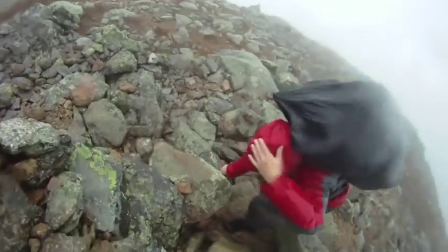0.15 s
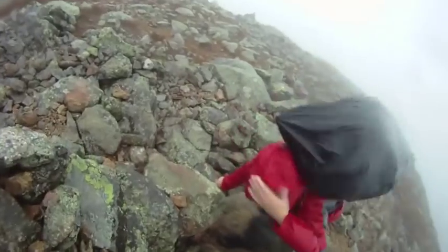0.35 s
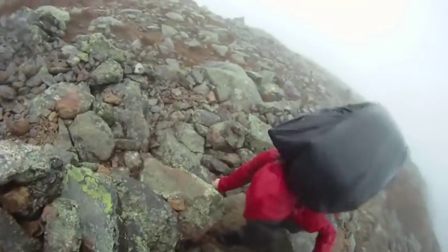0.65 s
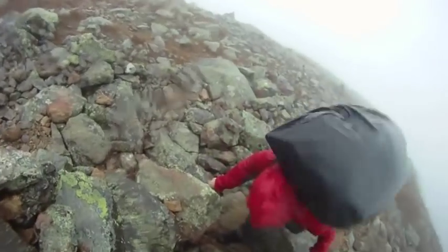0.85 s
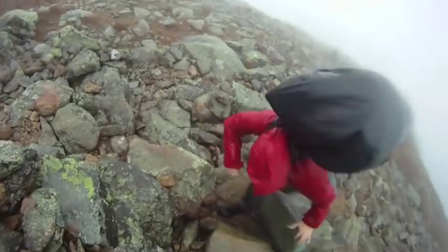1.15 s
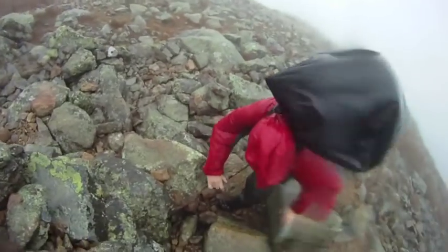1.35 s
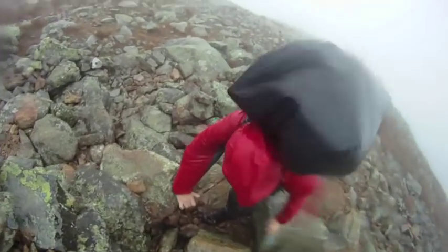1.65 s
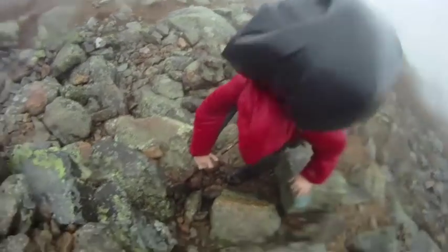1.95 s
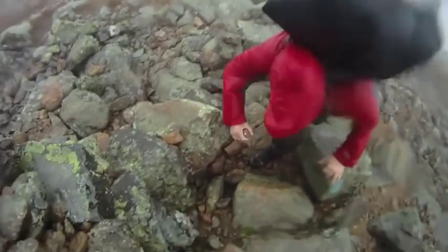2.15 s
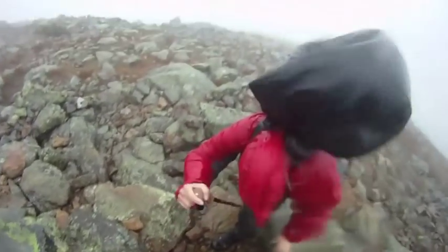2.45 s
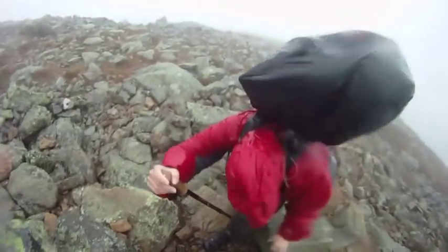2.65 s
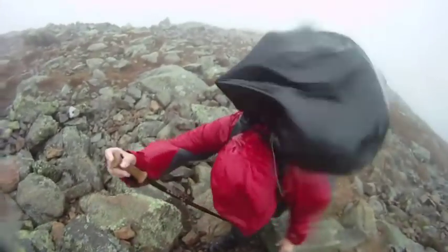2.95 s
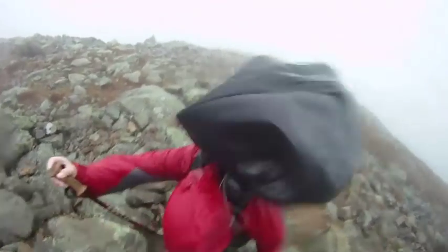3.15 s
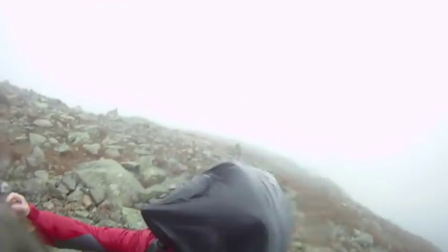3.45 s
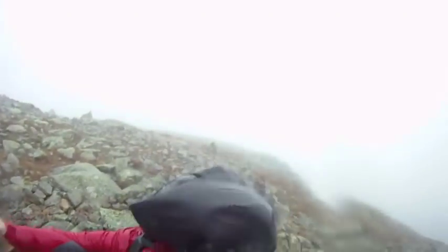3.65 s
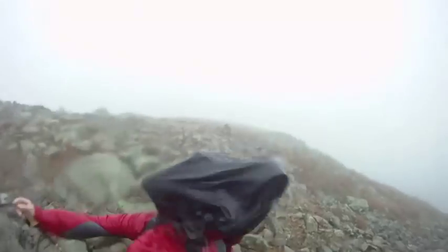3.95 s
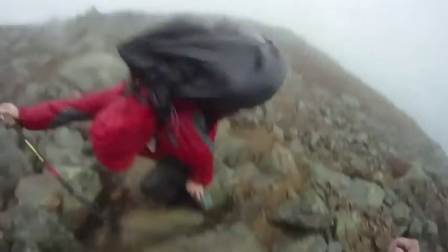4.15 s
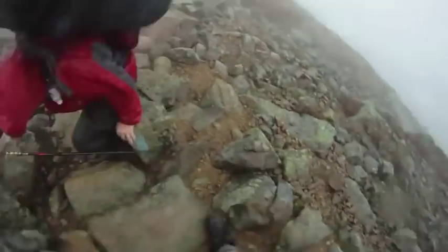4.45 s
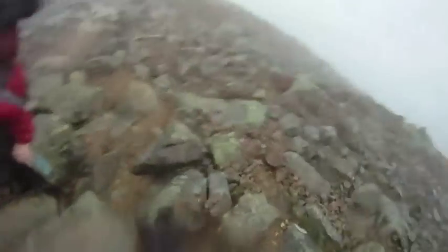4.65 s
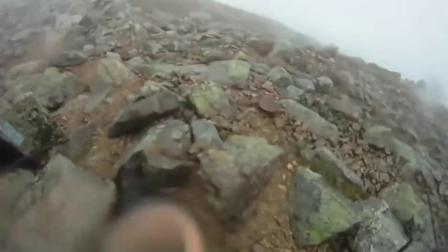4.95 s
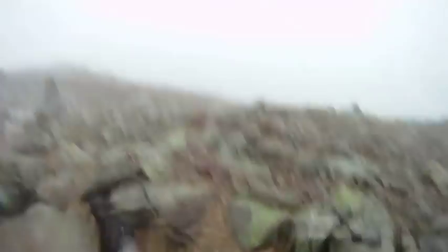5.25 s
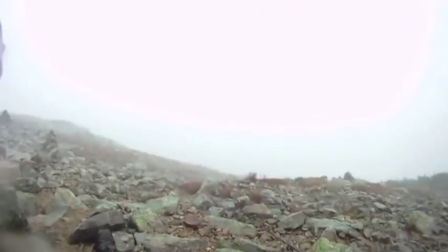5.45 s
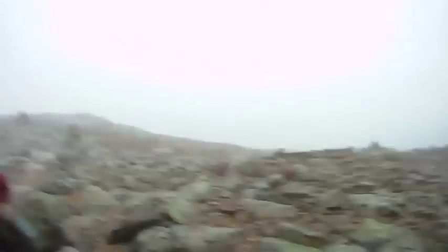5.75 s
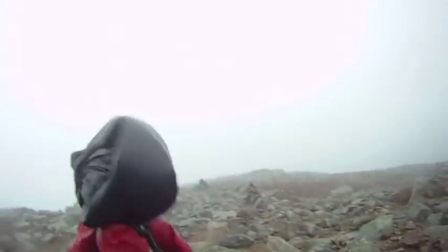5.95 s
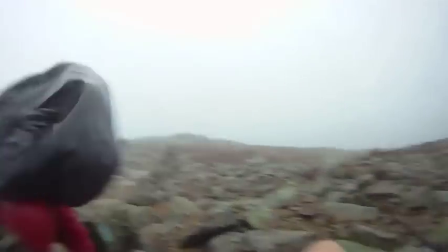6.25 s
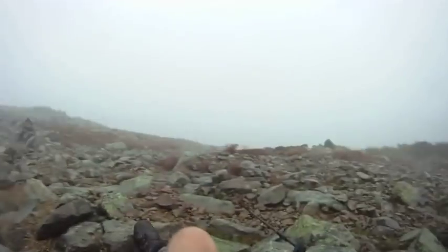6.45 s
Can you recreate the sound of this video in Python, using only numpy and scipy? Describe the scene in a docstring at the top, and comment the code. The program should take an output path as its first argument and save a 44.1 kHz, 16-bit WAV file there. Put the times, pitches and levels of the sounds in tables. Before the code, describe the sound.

Rain smacks the plastic case of a small body-worn camera in a storm on an open ridge. At first, soft, scattered drops tick over a low wind rumble. From 0.75 to 1.3 seconds they crowd into a rapid, loud flurry of sharp cracks, each with a brief plastic ring, some with a dull thud. Until about 3.5 seconds separate hard smacks and light ticks continue irregularly, while short gusts bump and hiss, the wind swelling around 3. From 3.6 to 4.8 seconds the hits soften, with thicker fine pattering. Between 4.9 and 5.75 the rain almost stops; a fluttering wind swell at 5 drops back to low buffeting. A gust and loud smack near 5.8 to 5.9 restart the pattering, with one more strong crack around 6.4. Everything is very close and dry, loud hits flattening and briefly dipping the level.

```python
"""Rain smacks against the plastic housing of a small body-worn camera, in a storm on a bare mountain ridge.
Each heavy drop cracks, rings the case and thuds; finer droplets tick at random between them.
Behind the rain the wind swells and eases: shaped noise gives a low buffeting, a flutter of eddies
and a rush over the case, with short gusts on top.
Loud smacks overload the microphone and make its gain duck for a moment."""
import sys
import numpy as np
from scipy import signal
from scipy.fft import rfft, irfft
from scipy.io import wavfile
from scipy.ndimage import uniform_filter1d

SR = 44100
rng = np.random.default_rng(int(sys.argv[2]) if len(sys.argv) > 2 else 0)


def wav_out(sig):
    """Save sig, one row per channel (or a flat mono array), as 16-bit PCM at SR to the path in sys.argv[1]."""
    wavfile.write(sys.argv[1], SR, np.round(np.clip(np.atleast_2d(sig).T, -1, 1) * 32767).astype(np.int16))


N = 291536   # length of the scene in samples


def from_db(db):
    """Turn decibels into a gain."""
    return 10 ** (np.asarray(db) / 20)


def rms_one(x):
    """Scale to rms 1."""
    return x / np.sqrt(np.mean(x ** 2) + 1e-20)


def peak_one(hits):
    """Scale each row so that its loudest moment (36 samples long) has rms 1."""
    power = uniform_filter1d(hits ** 2, size=36)
    return hits / np.sqrt(power.max(axis=1, keepdims=True) + 1e-20)


def in_time(rows):
    """Draw each column of a table as a curve with a value at every sample."""
    t, *columns = np.transpose(rows)
    return [np.interp(np.arange(N) / SR, t, column) for column in columns]


def butter(x, hz, kind, order=2):
    """Keep the lows or the highs with a causal filter."""
    sos = signal.butter(order, min(hz, .45 * SR), kind, fs=SR, output="sos")
    return signal.sosfilt(sos, x + 1e-18)


def drift(rate_hz):
    """Wander slowly at random, with spread 1."""
    step = 40   # one random value per 40 samples is enough for a slow curve
    r = np.exp(-2 * np.pi * rate_hz * step / SR)
    raw = rng.standard_normal(N // step + 2002)
    slow = signal.lfilter([1], [1, -2 * r, r * r], raw)[2000:]   # skip the filter's start
    return np.interp(np.arange(N) / step, np.arange(len(slow)), rms_one(slow))


def noise(spectrum):
    """Shape random noise to a given spectrum, rms 1."""
    hz, db = np.transpose(spectrum)
    grid = np.maximum(np.fft.rfftfreq(N, 1 / SR), 1)
    gain = from_db(np.interp(np.log(grid), np.log(hz), db))
    return rms_one(irfft(rfft(rng.standard_normal(N)) * gain, N))


def colour(x, peaks):
    """Pass sound through a chain of resonances (positive dB) and hollows (negative dB)."""
    for hz, width_hz, db in peaks:
        g = from_db(db / 2)
        k = np.tan(np.pi * width_hz / SR)
        c = -2 * np.cos(2 * np.pi * hz / SR)
        x = signal.lfilter([1 + k * g, c, 1 - k * g], [1 + k / g, c, 1 - k / g], x)
    return x


# heavy drops on the case: t/s, level/dB, f/Hz of the ring before it wavers,
# thud/dB before the lift shared by all thuds, length/ms
HEAVY_DROPS = [(0.0044, -13.5, 1230, -51, 1.8), (0.0215, -12.5, 1300, -35, 3.1),
               (0.1807, -20, 3570, -40, 4.6), (0.1987, -16, 3050, -58, 2.1), (0.2976, -6.5, 2100, -33, 1.7),
               (0.3482, -14.5, 1230, -53, 2.5), (0.4547, 0, 2257, -23, 1), (0.564, -9.5, 2560, -31, 2.1),
               (0.572, -14.5, 2280, -44, 2.3), (0.607, -2.5, 2440, -39, 1.33),
               (0.6489, -10, 3430, -46, 2.4), (0.7389, -12, 2300, -39, 1.3), (0.7626, -13, 2250, -46, 2),
               (0.7707, -7.5, 2130, -31, 1.7), (0.8052, 2.5, 2050, -30, 1.14), (0.852, 4, 3700, -38, 1.03),
               (0.8568, 5, 3690, -35, 1.7), (0.869, 1.5, 1620, -37, 1.9), (0.8822, -5, 3580, -47, 2.2),
               (0.9241, -1.5, 2775, -50, 3.3), (0.9986, 0.5, 3480, -17, 4.1),
               (1.0352, -2.5, 2870, -56, 2.2), (1.063, -4, 2160, -39, 2.8), (1.0948, 2.5, 2830, -48, 2.3),
               (1.1289, -4, 3080, -84, 2.2), (1.1423, -5.5, 2700, -54, 1.1), (1.1523, -5, 3050, -25, 1.9),
               (1.165, 7.5, 3790, -28, 1.2), (1.1828, 6.5, 2180, -49, 1.8), (1.2397, 1.5, 2030, -37, 0.95),
               (1.285, -14, 3540, -37, 2.3), (1.3521, -10.5, 2770, -47, 2.4), (1.3872, -10, 2130, -37, 1.4),
               (1.4069, -12, 2240, -32.5, 3.1), (1.4503, -3, 1370, -19, 1.4), (1.491, -4, 3590, -54, 1),
               (1.5975, -5.5, 2320, -37, 2.3), (1.6078, -8, 2050, -49, 2.5), (1.6763, -6.5, 2180, -47, 1.3),
               (1.7, -11.5, 2340, -35, 3.1), (1.7082, -6, 2250, -36, 1.9), (1.748, -5, 1360, -60, 2.8),
               (1.8299, -14.5, 3550, -42, 2), (1.8907, -3.5, 1860, -40, 1.46), (1.92, -6.5, 2210, -45, 1.5),
               (1.9397, 1, 3350, -42, 1.46), (2.1288, -15.5, 2820, -43, 2.7), (2.308, 4.5, 2060, -33, 1.23),
               (2.4067, 0.5, 2330, -40, 3), (2.466, -9, 1255, -56, 1.95), (2.49, -7.5, 2220, -57, 1.9),
               (2.6889, 4, 2180, -43, 1.12), (2.7899, 0, 3570, -37, 1.75), (2.9034, -10.5, 2280, -35, 1.6),
               (3.02, -6.5, 2990, -30, 2.7), (3.0743, -7.5, 3570, -43, 3), (3.1083, -2.5, 2070, -73, 1.1),
               (3.1274, -1.5, 2670, -44, 2.6), (3.1897, -7.5, 1800, -35, 1), (3.2663, -7.5, 1880, -46, 2.5),
               (3.2894, -3.5, 1550, -43, 2.6), (3.3165, -8, 1880, -37, 0.59), (3.3298, -3, 3650, -31, 1.7),
               (3.3464, -3, 2190, -39, 1.3), (3.4128, -12.5, 3520, -45, 2.1), (3.4591, 3.5, 1950, -44, 1.6),
               (3.6359, -1.5, 2170, -28, 2.24), (3.6638, -15, 2290, -57, 2), (3.7513, -6.5, 3610, -37, 2.3),
               (3.8003, -13.5, 2170, -44, 1.3), (3.8496, -0.5, 2910, -38, 1.9),
               (3.908, -2.5, 2110, -39, 1.8), (3.9684, -11.5, 3470, -53, 1.9),
               (3.977, -14.5, 2680, -48, 2.9), (3.9922, -16, 2300, -48, 2), (4.1143, -6, 2720, -32, 2.3),
               (4.154, -14.5, 2040, -47, 3.9), (4.2, -4.5, 2900, -40, 1.4), (4.2661, -16.5, 2070, -45, 1.4),
               (4.3076, -9, 1930, -40, 1.3), (4.342, -12.5, 2900, -44, 1.5), (4.355, -9.5, 2720, -35, 2.9),
               (4.4035, -7, 2160, -56, 1.9), (4.4394, -6, 3320, -51, 2.5), (4.481, -7.5, 2470, -53, 2),
               (4.6283, -9.5, 2150, -35, 2.3), (4.647, -10.5, 2190, -29.5, 2.1),
               (4.6675, -12, 2630, -60, 4.5), (4.7566, -12, 3600, -50, 1.7), (4.79, -15.5, 2230, -49, 1.7),
               (4.8417, -18, 2770, -48, 1.3), (4.8579, -9, 2220, -55, 1.5), (5.4071, -24, 3670, -42, 3.1),
               (5.5644, -12, 1300, -55, 2.3), (5.7943, -11.5, 3340, -34.5, 1.7),
               (5.8619, -12.5, 2500, -39, 2.3), (5.904, 5.5, 2815, -25, 1.2), (5.9122, -8, 2390, -50, 3),
               (5.9466, -7, 2380, -55, 2.4), (6.0791, -4, 3560, -55, 1.7), (6.109, -11.5, 2630, -36, 3.5),
               (6.1526, -15.5, 1930, -49, 3.7), (6.2158, -12, 2280, -35.5, 1.8),
               (6.2606, -13, 3030, -38, 1.6), (6.2945, -9.5, 1920, -46, 3), (6.3096, -12, 2190, -44, 3.5),
               (6.3664, -1, 1950, -49, 1.64)]
# resonances of the case, as the wind rings it: f/Hz, width/Hz, level/dB
CASE_RESONANCES = [(1208, 79, 9), (2150, 415, 8.5), (3640, 167, 10)]


def drops(rows, wobble=0.3196, splash=1.0, splash_pitch_hz=2600, overload_db=-3.5, thud_lift_db=8.5,
          crack=1.0, crack_s=0.0001):
    """Each drop cracks, then rings its spot on the case as it spreads; hard ones are clipped flat."""
    s, level_db, pitch_hz, thud_db, length_ms = np.array(rows).T[:, :, None]
    t = np.arange(SR // 80) / SR
    waver, spray, slap = rng.standard_normal((3, len(rows), len(t)))

    age = t / (length_ms / 1000)
    fade = np.exp(-age ** 3) + .05 * np.exp(-t / .002)
    spreading = (1 - np.exp(-t / .0003)) * fade

    bend = np.exp(wobble * rms_one(butter(waver, 1163, "low")))   # the water's load bends the pitch
    ring = np.sin(2 * np.pi * np.cumsum(pitch_hz * bend, axis=1) / SR)
    spray = butter(butter(spray, 1450, "high", order=1), 9900, "low", order=1)
    spray = spray * splash * pitch_hz / splash_pitch_hz   # higher-ringing drops splash more
    hits = spreading * (ring + spray) + crack * spray * np.exp(-t / crack_s)

    damped = np.array(CASE_RESONANCES) * [1, 2, .5]   # the water makes them wider and weaker
    hits = peak_one(colour(butter(hits, 1400, "high"), damped))
    drive_db = np.clip((level_db - overload_db) / 2, -10, 8)
    hits = peak_one(np.tanh(hits * from_db(drive_db)))   # the harder the drop, the flatter its peaks

    thud = butter(butter(slap * spreading, 900, "low"), 135, "high")   # the whole case is jolted
    hits = from_db(level_db) * hits + from_db(thud_db + thud_lift_db) * peak_one(thud)
    at = (np.maximum(s, 0) * SR).astype(int) + np.arange(len(t))
    return np.bincount(at.ravel(), hits.ravel(), N)[:N]


# how thickly the fine rain falls: t/s, rate/(droplets per s)
DRIZZLE_RATE = [(0, 60), (.55, 70), (.8, 190), (1.25, 180), (1.55, 55), (1.9, 70), (2.1, 25), (2.9, 35),
                (3.9, 90), (4.7, 110), (4.88, 3), (5.78, 10), (5.8, 120), (6.3, 60), (6.4, 12)]
DROPLET_DB, DROPLET_SPREAD_DB = -24, 5   # in average wind
DROPLET_FOLLOWS = 0.35   # dB of droplet level per dB of change in the rush
DROPLET_THUD_DB = -48   # against the droplet's tick, before the lift shared by all thuds


def drizzle(per_s, rush_db, length_ms=1.0, pitch_hz=2714.0):
    """Droplets of many sizes tick at random between the heavy drops, harder in faster air."""
    at = np.flatnonzero(rng.random(N) < per_s / SR)
    size, length, spot = np.clip(rng.standard_normal((len(at), 3)), -2, 2).T
    wind_lift_db = DROPLET_FOLLOWS * (rush_db[at] - rush_db.mean())
    levels = DROPLET_DB + DROPLET_SPREAD_DB * size + wind_lift_db
    lengths = length_ms * np.exp(0.26 * length)
    pitches = pitch_hz * np.exp(0.381 * spot)
    return drops(np.column_stack([at / SR, levels, pitches, levels + DROPLET_THUD_DB, lengths]))


# slow swell of the wind, before the gusts:
# t/s, buffeting level/dB, fluttering eddies level/dB, rush over the case level/dB
WIND_SWELL = [(0, -34.5, -49.5, -45), (.48, -34, -51, -41.5), (.85, -25.5, -42.5, -36),
              (1.35, -29.5, -46, -32.5), (1.62, -27, -53, -46), (2.0, -31.5, -46, -39.5),
              (2.72, -28.5, -41.5, -34.5), (2.9, -25, -38, -32), (3.6, -27.5, -40, -34.5),
              (4.3, -37, -42, -32.5), (4.55, -37.5, -46.5, -38), (4.85, -29.5, -49, -44),
              (5.02, -25, -34, -32.5), (5.3, -29, -51, -63), (5.68, -33, -45.5, -40),
              (6.05, -34, -43.5, -40.5), (6.4, -27, -46.5, -40), (6.6, -22.5, -37, -37.5)]
# short gusts: t/s at the crest, length/s, lift of the buffeting/dB, lift of the rush/dB
SHORT_GUSTS = [(0.805, 0.069, 4.5, 14.5), (1.185, 0.07, -2.5, 8.5), (1.328, 0.084, 7, -6),
               (1.451, 0.033, 8.5, 11), (1.898, 0.093, 1, 16), (2.07, 0.062, 8.5, 1), (2.168, 0.16, 7, -1),
               (2.29, 0.11, 5.5, 9.5), (2.392, 0.17, 5, 4.5), (2.581, 0.052, 5, -7), (2.986, 0.17, 5, -0.5),
               (3.248, 0.04, 6, 1.5), (3.345, 0.029, 17, 9), (3.444, 0.028, 7.5, 2.5),
               (3.593, 0.11, 6.5, -1), (3.808, 0.11, 2.5, 4.5), (4.045, .1, 7.5, -1),
               (5.813, 0.055, 15, 12.5)]


def airflow():
    """Each gust is a smooth hump on the slow swell; the eddies follow the mean of its two lifts."""
    buffet_db, eddy_db, rush_db = in_time(WIND_SWELL)
    t = np.arange(N) / SR
    for s, length_s, buffet_lift_db, rush_lift_db in SHORT_GUSTS:
        hump = np.cos(np.pi * np.clip((t - s) / length_s, -.5, .5))
        buffet_db = buffet_db + buffet_lift_db * hump
        eddy_db = eddy_db + (buffet_lift_db + rush_lift_db) / 2 * hump
        rush_db = rush_db + rush_lift_db * hump
    return buffet_db, eddy_db, rush_db


# colour of the buffeting noise: f/Hz, relative level/dB per Hz
BUFFET_SPECTRUM = [(12, 1), (24, -3.5), (33, 2), (50, 4), (75, 1), (115, -7), (190, -21.5), (330, -37.5)]
# colour of the fluttering eddies: f/Hz, relative level/dB per Hz
EDDY_SPECTRUM = [(60, -1), (150, 5), (250, 0.5), (420, -9), (800, -10.5), (1500, -9.5), (4000, -90)]
# colour of the rush before the case rings: f/Hz, relative level/dB per Hz
RUSH_SPECTRUM = [(300, -77), (750, -5), (1100, 0), (2000, 0), (3000, 0.5), (4200, -5), (5300, -7),
                 (6050, -14), (7000, -11.5), (10500, -8), (12000, -16.5), (13500, -11), (15000, -31)]


def wind(buffet_db, eddy_db, rush_db, lumpy_db=2.5, eddy_flutter_db=3.0, grain_db=6.5, brightening=0.42):
    """Large eddies push on the microphone; small ones flutter and rush along the case, sharing swirls."""
    swirl = drift(21.5)
    push = noise(BUFFET_SPECTRUM)
    push = push / np.sqrt(uniform_filter1d(push ** 2, size=SR // 18))   # even out its own slow swells
    buffet = push * from_db(buffet_db + lumpy_db * swirl)

    flutter = (swirl + drift(20)) / np.sqrt(2)
    eddies = noise(EDDY_SPECTRUM) * from_db(eddy_db + eddy_flutter_db * flutter)

    rush = rms_one(colour(noise(RUSH_SPECTRUM), CASE_RESONANCES))
    treble = rush - butter(rush, 4400, "low", order=1)
    treble_lift_db = brightening * (rush_db - rush_db.mean())
    rush = rush + treble * (from_db(treble_lift_db) - 1)   # faster air hisses brighter
    grain = (swirl + drift(70)) / 2
    return buffet + eddies + rush * from_db(rush_db + grain_db * grain)


def scene():
    """Add heavy drops, fine rain and wind on the case."""
    buffet_db, eddy_db, rush_db = airflow()
    per_s, = in_time(DRIZZLE_RATE)
    air = wind(buffet_db, eddy_db, rush_db)
    return (air + drizzle(per_s, rush_db) + drops(HEAVY_DROPS))[None]


def gain_control(x, threshold_db=-17.5, slope=0.45, release_db_per_s=125.0, attack_s=0.0052):
    """A loud smack pulls the gain down just after it; the gain then creeps back."""
    power = np.abs(butter(butter(x, 460, "high") ** 2, 190, "low", order=1))   # deaf to the low buffeting
    over_db = np.maximum(10 * np.log10(power + 1e-12) - threshold_db, 0)
    recovery = release_db_per_s * np.arange(N) / SR
    held_db = np.maximum.accumulate(slope * over_db + recovery) - recovery
    r = np.exp(-1 / (attack_s * SR))
    cut_db = signal.lfilter([(1 - r) ** 2], [1, -2 * r, r * r], held_db)   # the gain needs time to drop
    return x * from_db(-cut_db)


# resonances of the microphone's port: f/Hz, width/Hz, level/dB
PORT_RESONANCES = [(8380, 450, 6), (9600, 1000, 3), (14350, 1200, 6)]
# hollows where echoes inside the housing cancel: f/Hz, width/Hz, level/dB
HOUSING_HOLLOWS = [(5983, 387, -20), (11380, 550, -17.5), (12350, 1180, -27)]
CUTOFF_HZ = 15600


def record(dry, ceiling=0.38):
    """The gain ducks, peaks are rounded, port and housing colour the sound, the top is cut."""
    rounded = ceiling * np.tanh(gain_control(dry[0]) / ceiling)
    out = colour(rounded, PORT_RESONANCES + HOUSING_HOLLOWS)
    top_cut = signal.ellip(10, .3, 80, CUTOFF_HZ, fs=SR, output="sos")   # .3 dB ripple, then 80 dB down
    return signal.sosfilt(top_cut, out)[None]


dry = scene()
out = record(dry)
wav_out(out)
```